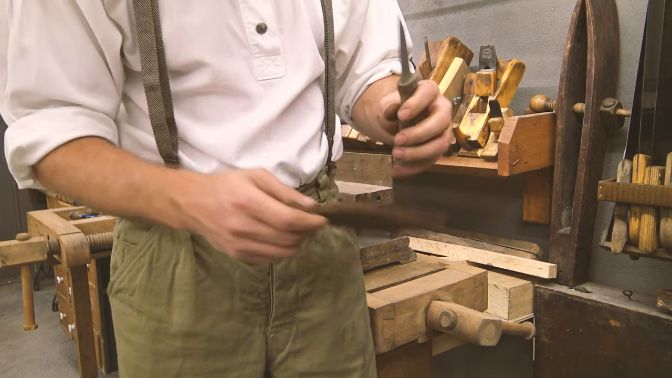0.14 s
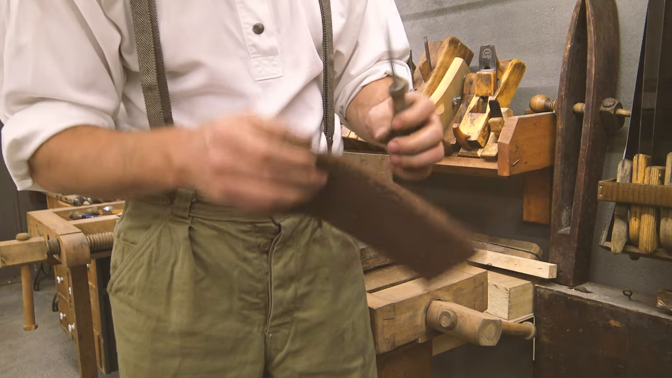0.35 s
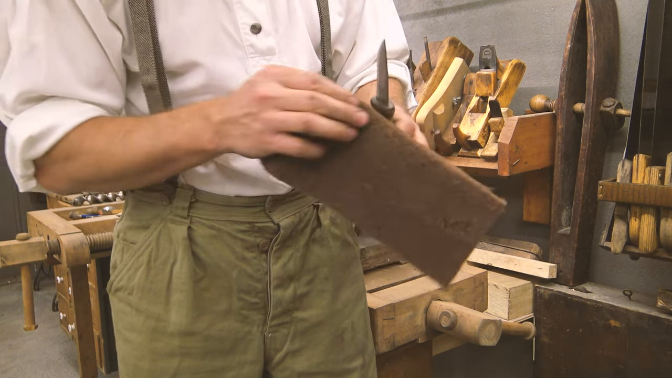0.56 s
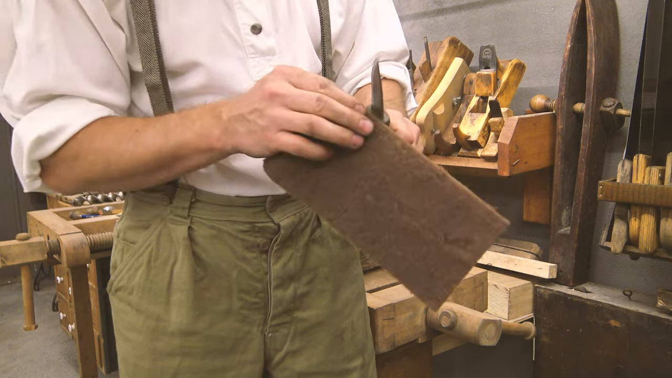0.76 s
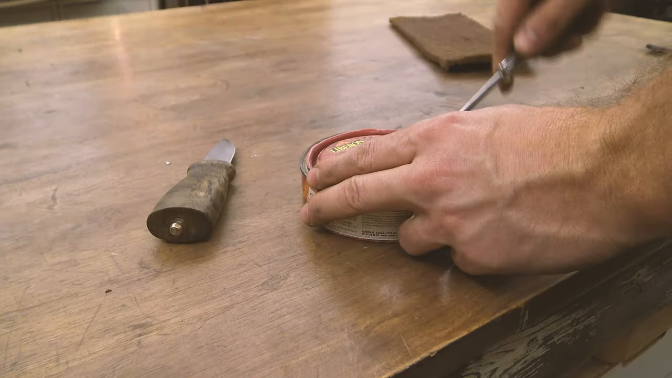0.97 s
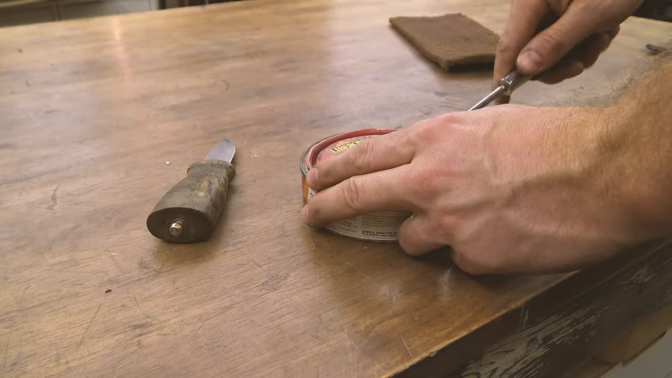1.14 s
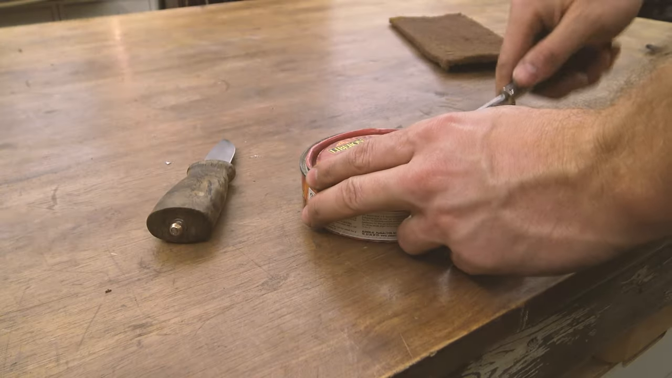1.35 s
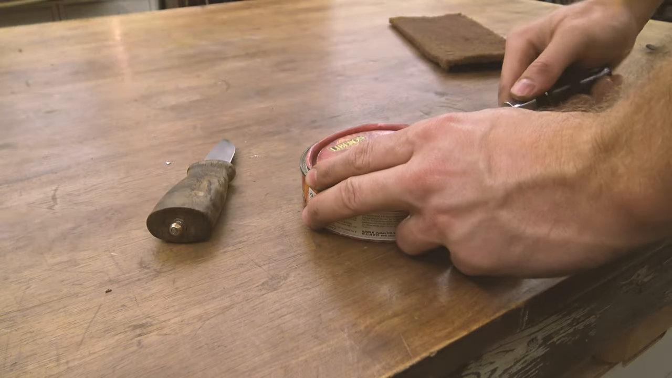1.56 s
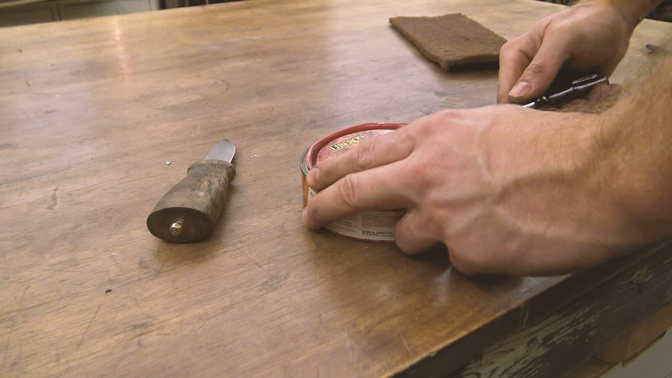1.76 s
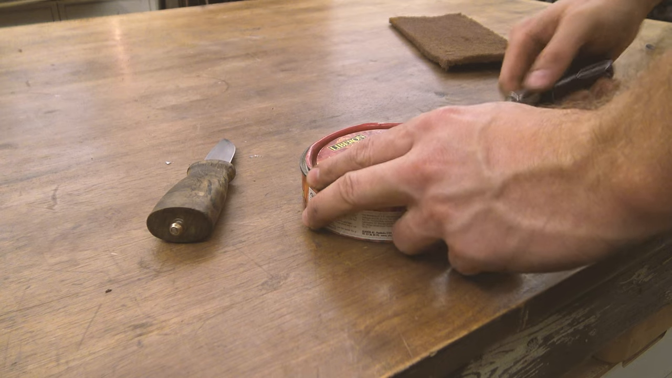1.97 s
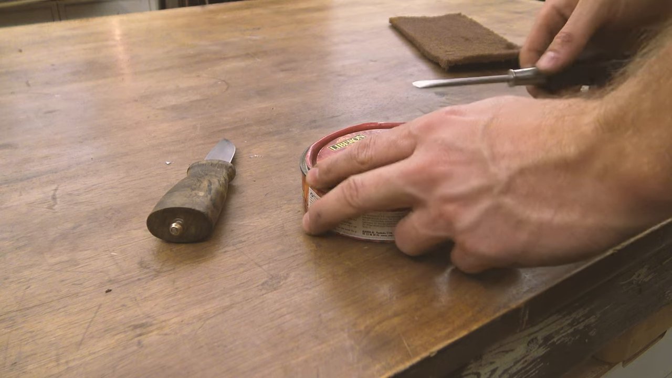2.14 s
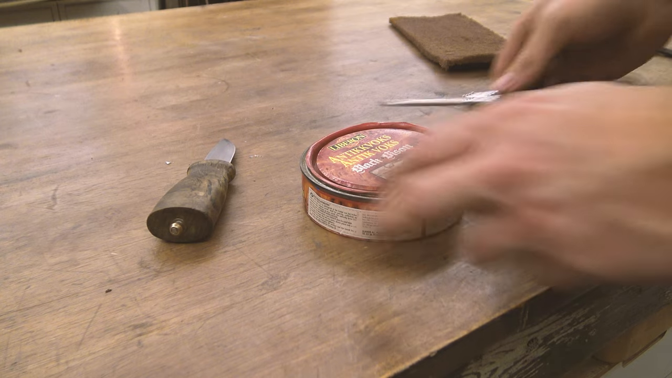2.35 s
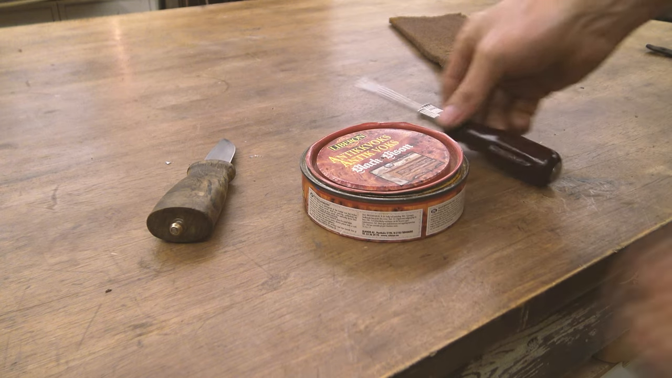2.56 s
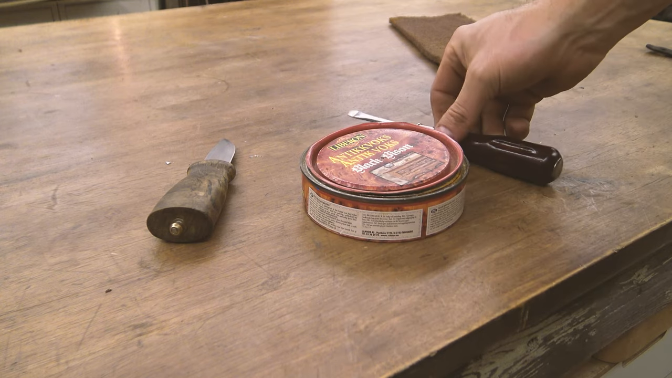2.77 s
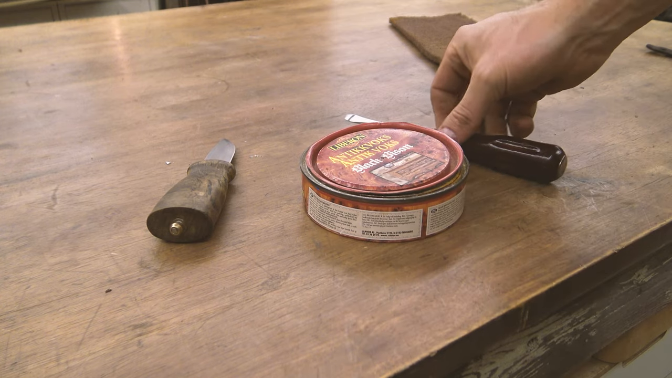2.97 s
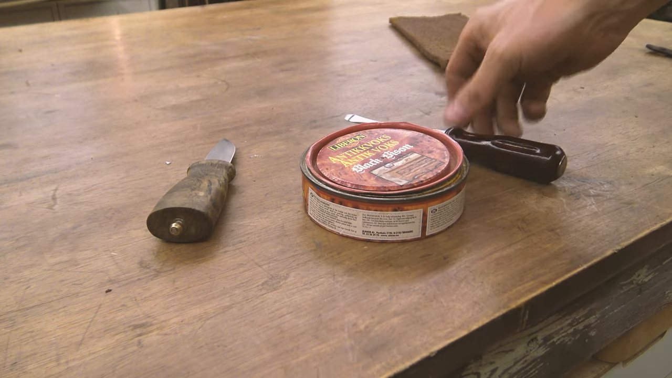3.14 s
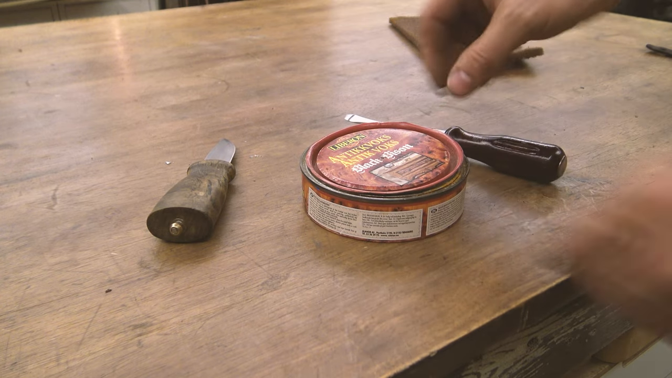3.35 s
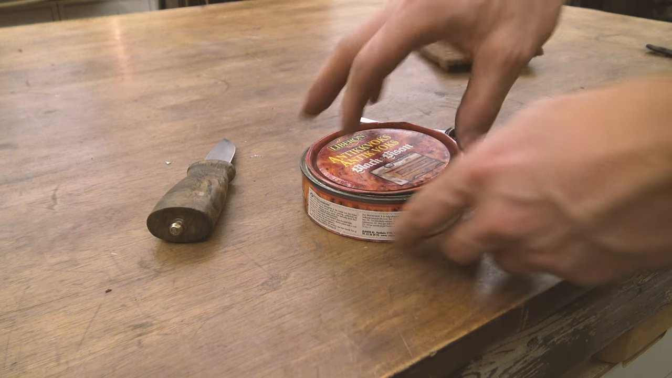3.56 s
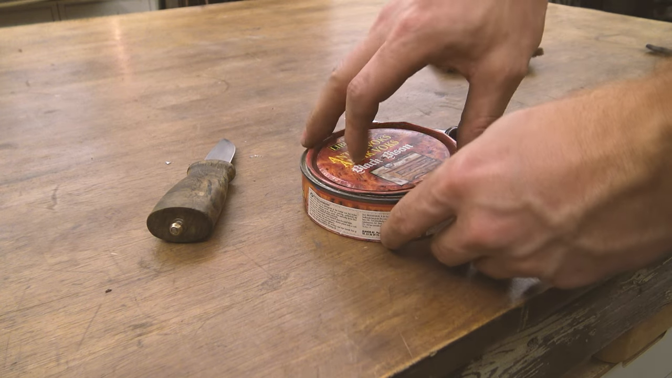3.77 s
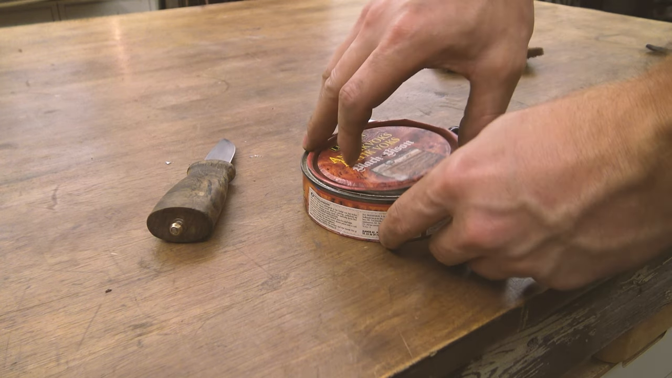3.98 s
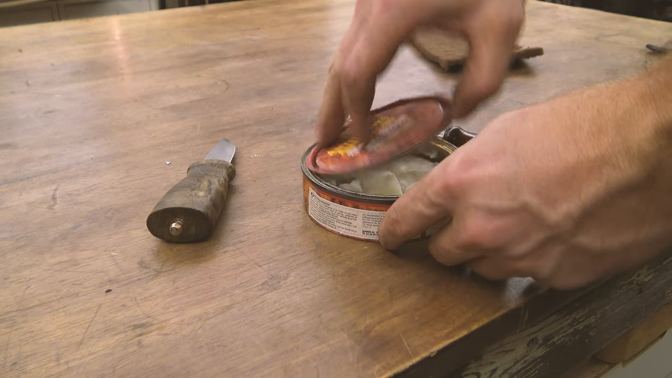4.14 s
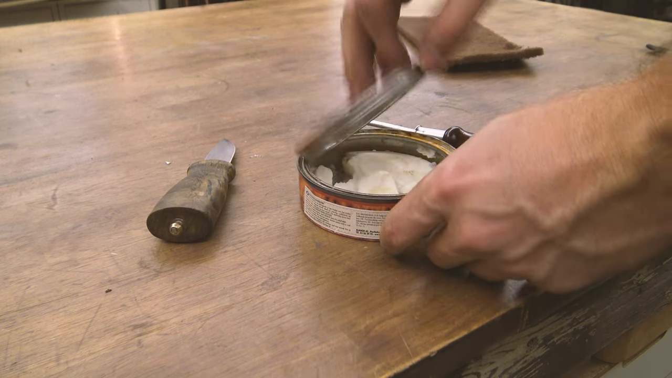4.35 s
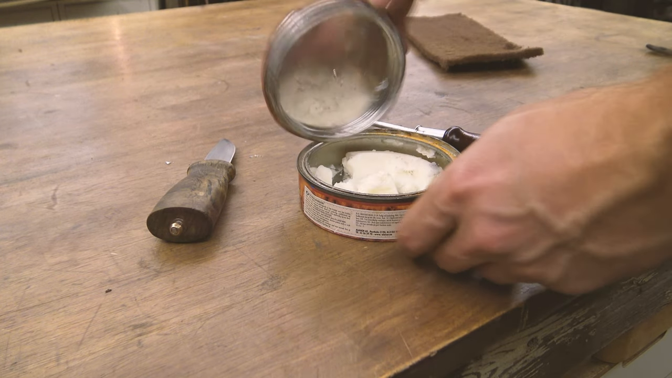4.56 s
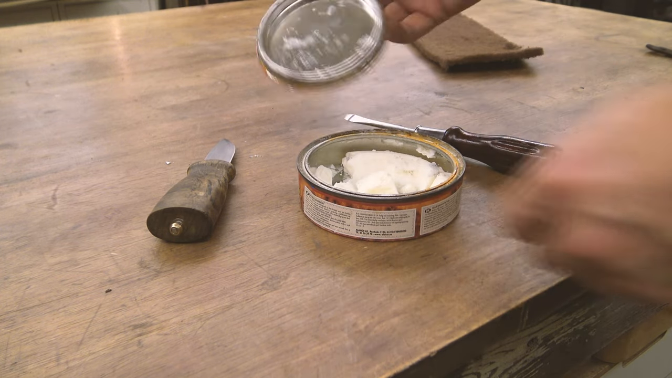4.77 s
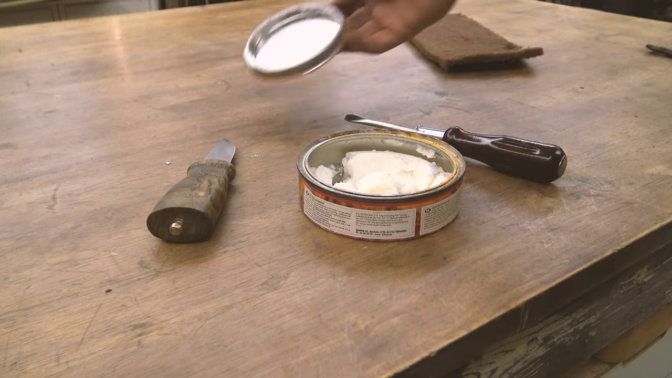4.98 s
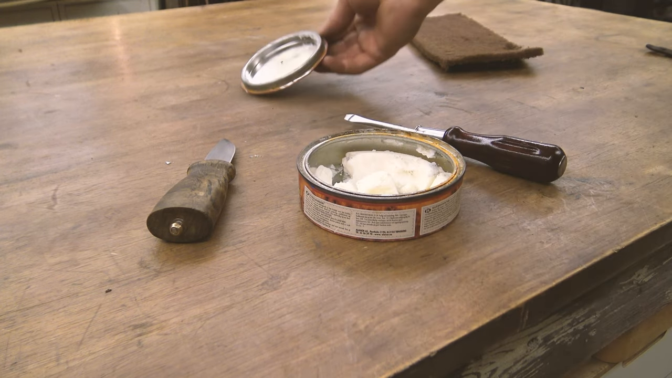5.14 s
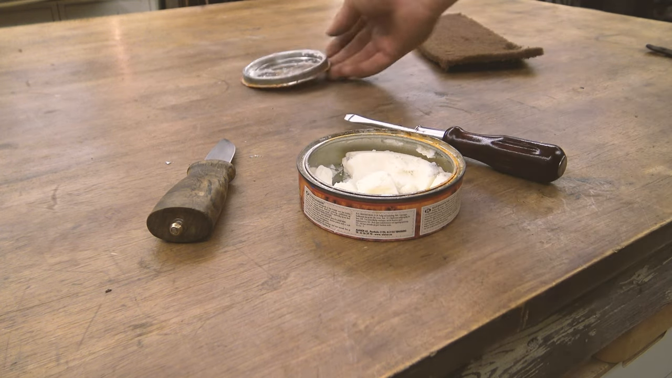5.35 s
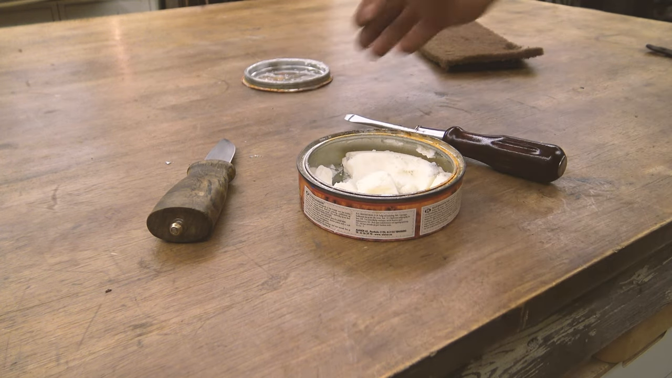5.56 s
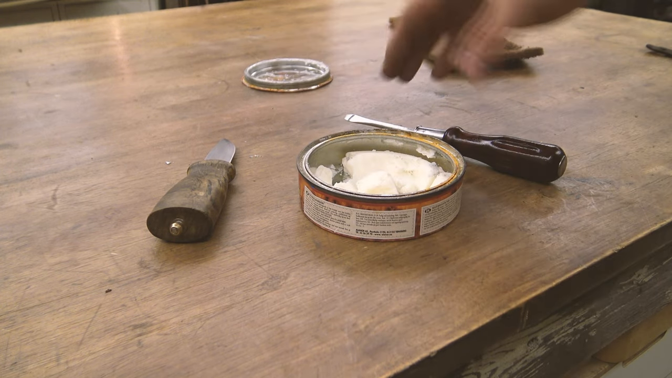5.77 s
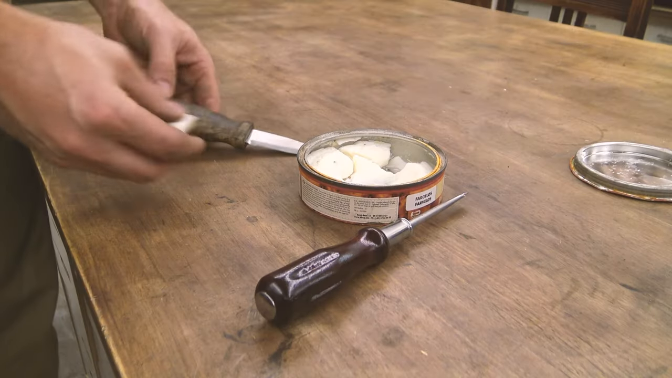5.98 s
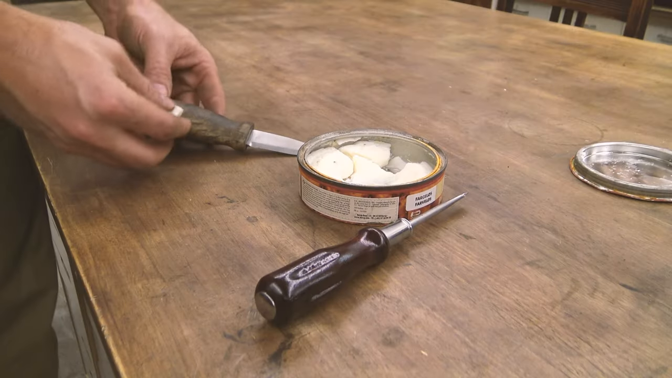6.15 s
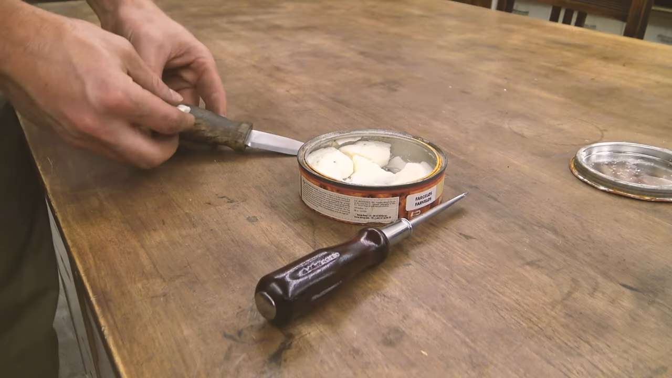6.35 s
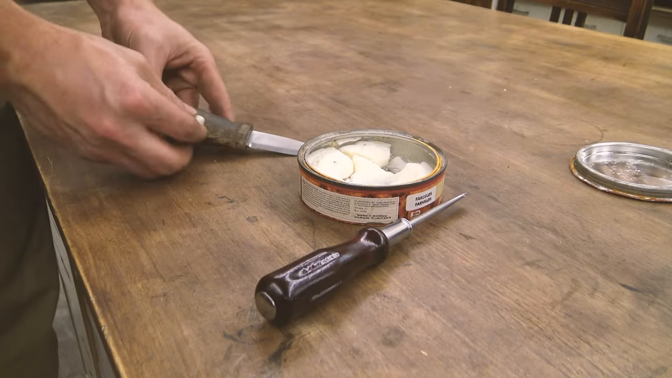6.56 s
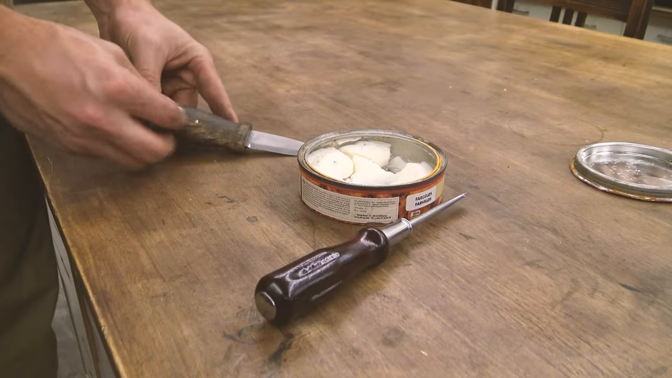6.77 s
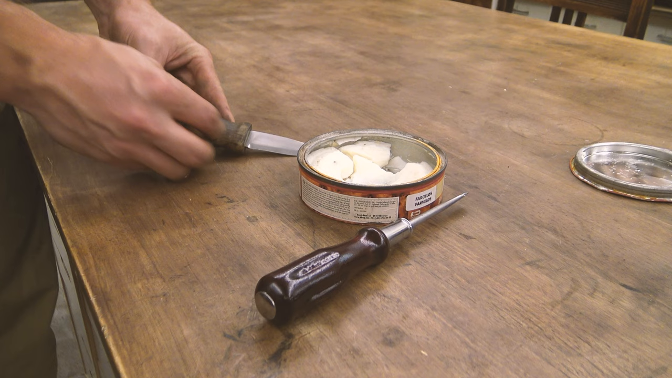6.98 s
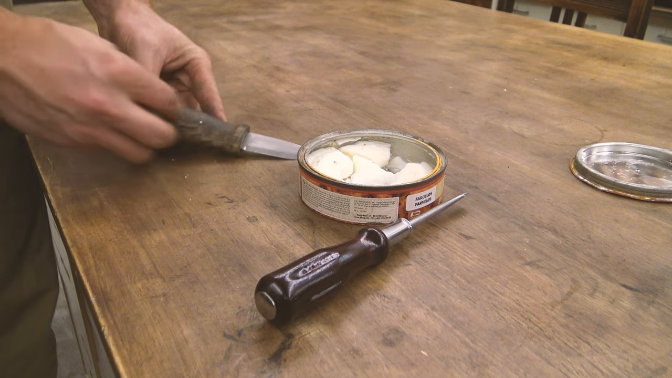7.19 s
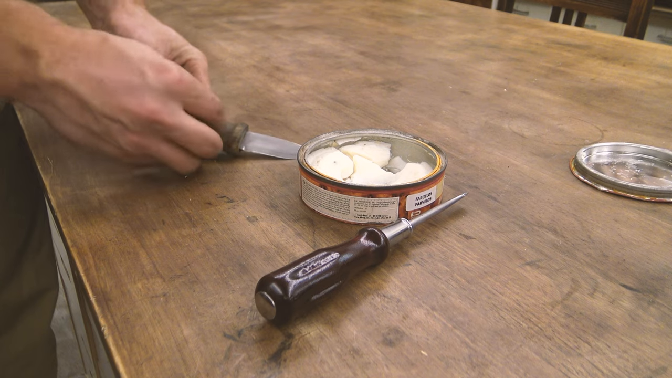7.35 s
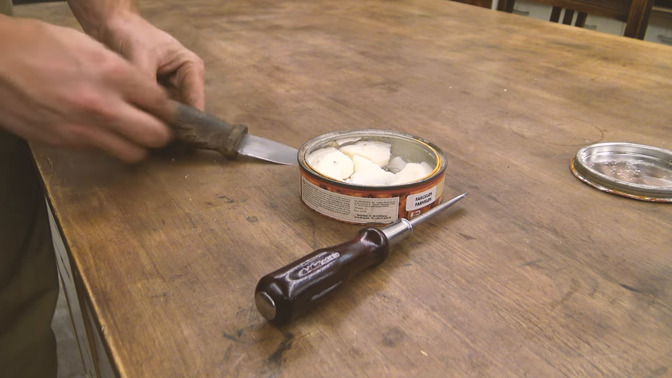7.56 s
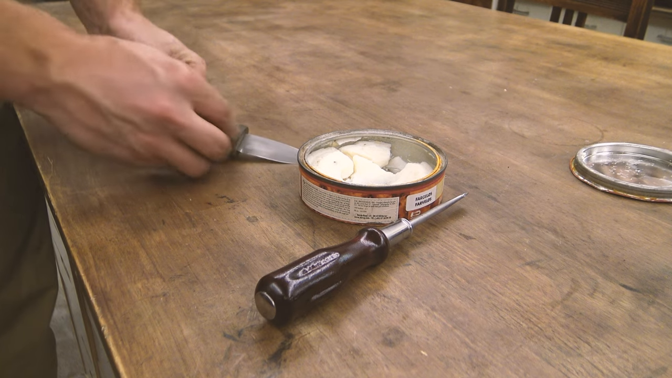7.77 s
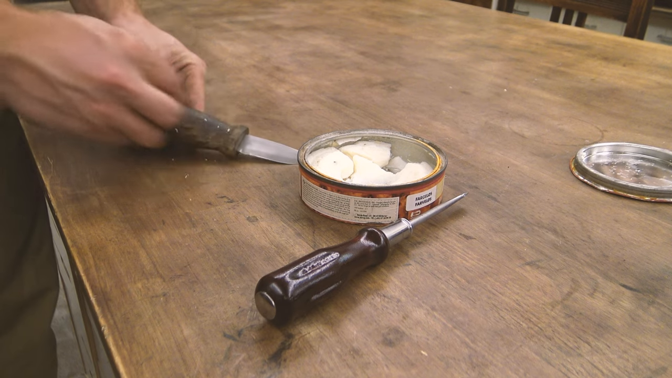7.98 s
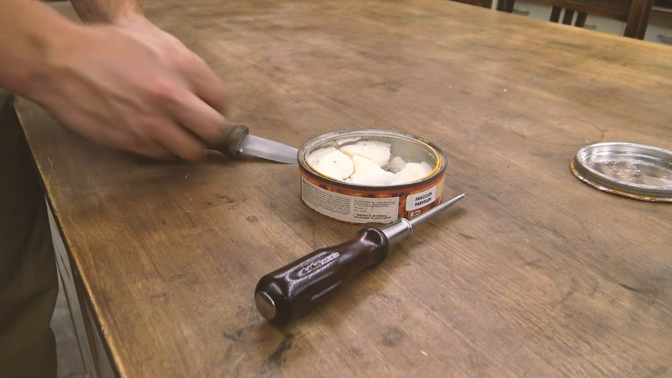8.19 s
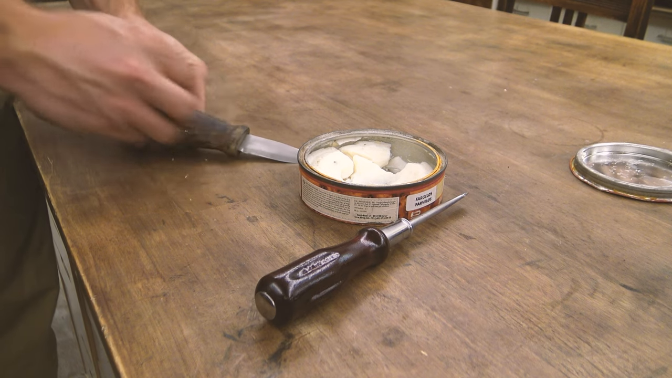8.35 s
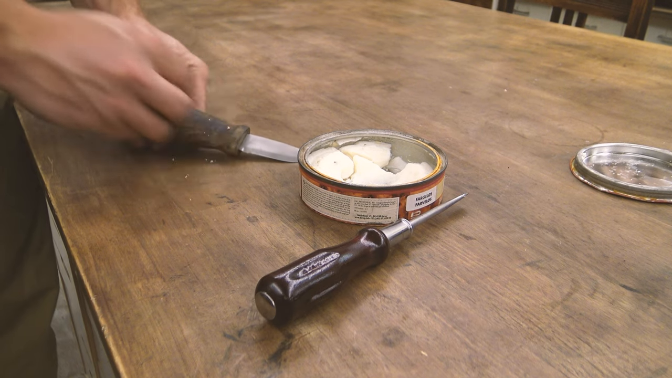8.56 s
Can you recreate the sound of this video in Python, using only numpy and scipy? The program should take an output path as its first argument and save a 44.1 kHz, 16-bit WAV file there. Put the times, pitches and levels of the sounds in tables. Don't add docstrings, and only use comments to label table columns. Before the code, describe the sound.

In a quiet workshop, a tin lid is pried with dull knocks, a screwdriver drops, the lid clanks and rattles, then a knife handle knocks wood.

```python
import sys
import numpy as np
from scipy import signal
from scipy.fft import rfft, irfft
from scipy.io import wavfile
from scipy.ndimage import uniform_filter1d, minimum_filter1d

SR = 44100
rng = np.random.default_rng(int(sys.argv[2]) if len(sys.argv) > 2 else 0)


def boost_factor(decibels):
    exponent = np.asarray(decibels, float) / 20
    return 10 ** exponent


def transcribe(u):
    v = np.clip(np.atleast_2d(u).T, -1, 1)
    q = np.round(v * 32767).astype(np.int16)
    wavfile.write(sys.argv[1], SR, q)


N = 380141

# frequency in Hz, level in dB per Hz.
HISS = [(12, -23), (20, -32), (53, -1), (262, 2.5), (293, 2.5), (422, 2), (527, -1), (590, 1), (678, 0.5),
        (1150, -2), (1610, -4), (2460, -6.5), (2670, -7.5), (6910, -9), (16000, -21)]
# start in seconds, hiss in dB, extra top-end hiss in dB.
SHOTS = [
    (0, -59.5, -70),
    (1.0, -58.5, -72),
    (5.9, -57.5, -88),
]
CROSSFADE_S = 0.068
# middle in seconds, half length in seconds, swell in dB.
RUSTLES = [
    (0, 0.14, 3),
    (3.595, 0.19, 2.5),
]

# frequency in Hz, t60 in seconds.
ROOM = [(100, 0.58), (300, 0.46), (1000, 0.39), (3000, 0.33), (8000, 0.28), (15000, 0.14)]
# frequency in Hz, level in dB, t60 in seconds.
ROOM_MODES = [(113.8, -41, 0.57), (121, -66, 0.7)]
# delay in seconds, level in dB.
NEAR_ECHOES = [(.0074, -13.5), (.0095, -8.5), (.0155, -23), (.021, -12.5)]
# delay in seconds, level in dB.
FAR_ECHOES = [(.004, 3.5), (.0115, -7.5), (.0145, -6.5), (.031, -12), (.045, -21)]
# frequency in Hz, level in dB.
NEAR_COLOUR = [(100, 9.5), (500, 4.5), (1500, 5), (4000, 4), (8000, 0.5), (15000, -27)]
# frequency in Hz, level in dB.
FAR_COLOUR = [(100, -4.5), (400, -3), (1000, -1), (1800, 0.5), (3000, 2.5), (5000, -2.5), (8000, -5),
              (15000, -10.5)]
FAR_LAG_S, FAR_DB = .0553, 1.5
ECHO_CUT_HZ = 14000
CEILING = .35

# start in seconds, peak in dB, brightness in dB per octave, ring in dB.
SEAM = [
    (1.002, -48, -4, -6),
    (1.011, -44.5, -0.5, -1),
    (1.024, -50, -3, -7),
]
# start in seconds, peak in dB, brightness in dB per octave, ring in dB.
PRY = [
    (1.327, -33.5, -7.5, 0),
    (1.349, -54, -5, 3),
    (1.594, -40.5, -7.5, 1),
    (1.602, -34.5, 2.5, -9),
    (1.61, -37, 1.5, -1),
    (1.869, -49.5, -10, -10),
]
# start in seconds, peak in dB, brightness in dB per octave, ring in dB.
TIP_OUT = [
    (2.204, -36, 4.5, -1),
    (2.209, -46, -6.5, 2),
]
# frequency in Hz, level in dB.
PRY_BODY = [(71, -47), (120, -18.5), (395, -4.5), (441, -9), (656, 5), (758, -12), (875, -6.5),
            (1300, -11.5), (1710, -18.5), (9000, -47), (11700, -65), (19800, -120)]
# frequency in Hz, level in dB, t60 in seconds.
TIN = [(318, -36, 0.069), (577, -23, 0.033), (646, 7, 0.11), (1040, -1, 0.12)]

# start in seconds, peak in dB, brightness in dB per octave, ring in dB.
DROP = [
    (2.5645, -8.5, 2.5, 2),
    (2.5725, -23.5, 1, -15),
    (2.577, -28, -3.5, -2),
    (2.596, -13.5, -3, -2.5),
    (2.634, -23.5, -7, -7),
]
# start in seconds, peak in dB, brightness in dB per octave, ring in dB.
SETTLE = [
    (2.856, -29, -2.5, -7),
    (2.871, -22.5, 2.5, -0.5),
    (2.889, -25, -4, -6),
    (2.909, -38, 0.5, 2),
    (5.928, -54.5, -5, 10),
]
# frequency in Hz, level in dB.
DROP_BODY = [(47, -59), (80, -38), (200, -21.5), (306, -14.5), (410, -8), (708, -16.5), (892, -11),
             (970, 4), (1200, -13), (1440, -10), (1750, -15.5), (2100, -27.5), (2900, -36), (3800, -35),
             (5300, -43.5), (6500, -50.5), (12000, -64), (15600, -95), (22000, -120)]
# frequency in Hz, level in dB.
SETTLE_BODY = [(59, -56), (100, -12.5), (269, -2.5), (318, 6.5), (447, -2.5), (690, 2), (850, -15.5),
               (4000, -57.5), (5200, -90), (8800, -120)]
# frequency in Hz, level in dB, t60 in seconds.
HANDLE = [(316, 4.5, 0.057), (510, -17, 0.028), (683, -2, 0.039), (726, 4, 0.13), (798, 8, 0.067),
          (887, -2, 0.12), (1090, -0.5, 0.029), (1410, -24, 0.067)]
HANDLE_FAR_DB = [0.76, 0, 1.5, 0.33, 0.085, 1.5, 0, 0.11]

# start in seconds, peak in dB,
# brightness in dB per octave, ring in dB.
NEAR_TICK = [
    (3.789, -43, 2, -20),
    (4.063, -39, 1.5, -20),
    (4.119, -37, 5, -24),
    (1.5, -40, 0, -9),
]
# start in seconds, peak in dB, brightness in dB per octave, ring in dB.
GRIP = [
    (3.734, -45.5, -4.5, -8),
    (3.924, -43.5, -5.5, -1),
    (3.952, -53, -0.5, 4),
    (4.005, -35.5, -2.5, -14),
    (4.0635, -38.5, 3, -12),
]
# frequency in Hz, level in dB.
GRIP_BODY = [(180, -36), (300, -9.5), (505, -6.5), (669, 0), (1040, -8.5), (1140, -19), (4000, -40),
             (5200, -71), (8800, -120)]
# start in seconds, peak in dB, brightness in dB per octave, ring in dB.
LIFT = [
    (4.238, -32.5, 3.5, -17),
    (4.304, -35, 3, -14),
    (4.462, -32, -2, -12),
    (4.499, -37.5, -5.5, -1),
    (4.534, -32.5, -5, -8),
    (4.588, -47, 0, 6.5),
]
# frequency in Hz, level in dB.
LIFT_BODY = [(71, -35.5), (120, -17), (318, -4.5), (355, 6), (457, -6.5), (1070, -1.5), (2780, -22),
             (6270, -27), (9000, -35), (11700, -66), (19800, -120)]
HELD_LID_HZ = [354, 765, 1028, 1592, 2218, 3860, 4900, 6180]
# level in dB, t60 in seconds.
HELD_LID_RING = [(5.5, 0.081), (-1.5, 1), (-1, 0.032), (1.5, 0.17), (0, 0.068), (-8, 0.067), (-13, 0.042),
                 (-13, 0.094)]
# start in seconds, peak in dB, brightness in dB per octave, ring in dB.
RIM_TICK = [
    (4.3585, -47, 7, 3),
    (4.4618, -35, 5.5, -5),
    (4.590, -48.5, 9, 7.5),
    (4.5954, -34.5, 1, -10),
    (4.6004, -31, 0, 6),
    (4.6045, -38, 1, 1),
    (4.609, -47, -12, -5),
]
# frequency in Hz, level in dB.
RIM_BODY = [(1180, -36), (2000, -16), (2200, -15), (3030, -29), (3980, -8.5), (4900, -10), (5800, -12),
            (6320, -9.5), (8320, -18.5), (13000, -37)]
RIM_HZ = [1340, 2240, 3240, 3950, 5080, 6200, 7300]
# level in dB, t60 in seconds.
RIM_RING = [(-6, .06), (-13, 0.055), (-28, .1), (-5.5, 0.072), (-21, .05), (-6.5, 0.06), (-22, 0.037)]
# start in seconds, peak in dB, brightness in dB per octave, ring in dB.
PING = [
    (4.566, -55, 5.5, -1),
    (4.654, -35, 0, 3.5),
    (4.658, -47, -2, 0),
]
# frequency in Hz, level in dB.
PING_BODY = [(3000, -60), (8000, -20), (10200, 0), (11500, -10), (15000, -47)]
# frequency in Hz, level in dB, t60 in seconds.
PING_MODES = [(9050, -9, .03), (10300, 0, .025)]

# time in seconds, level in dB, cavity in Hz, bright share in dB.
SLIDE = [
    (3.65, -60, 756, -10),
    (3.916, -47.5, 600, -23),
    (4.09, -66, 740, -8),
    (4.18, -37.5, 895, -5),
    (4.274, -34.5, 1140, -5.5),
    (4.424, -38.5, 1140, -5.5),
    (4.49, -49, 880, -33),
    (4.63, -43.5, 705, -27),
    (4.85, -57.5, 720, 13),
]
# frequency in Hz, level in dB, t60 in seconds.
RUBBED_LID = [(350, -0.5, 0.12), (850, 0, 0.058), (1640, -3, 0.014), (2100, -4, 0.017), (2370, -7, 0.051),
              (3240, -20, 0.066), (3960, -13, .03), (5100, -16, .03), (6160, -10, 0.045), (7100, -11, .04)]
SING_START_S = [3.92, 3.955, 4.12, 4.19, 4.24, 4.34, 4.32, 4.14, 4.33, 4.12, 4.21, 4.26, 4.31, 4.37, 4.6]
SING_LENGTH_S = [.05, .16, .07, .1, .085, .12, .15, .1, .14, .15, .04, .05, .045, .08, .09]
SING_FROM_HZ = [570, 730, 770, 840, 1140, 1090, 1335, 2150, 3205, 6170, 5080, 5120, 3950, 1600, 1590]
SING_TO_HZ = [560, 660, 830, 830, 1125, 1075, 1345, 2080, 3215, 6170, 5080, 5080, 3930, 1560, 1595]
SING_DB = [-61, -50, -62, -54, -50.5, -55.5, -56, -62.5, -62.5, -65.5, -65, -64, -60, -61, -61]
SING_WIDTH_HZ, SING_STEADY = 35, 1.1

# start in seconds, peak in dB, brightness in dB per octave, ring in dB.
TOUCH = [
    (5.173, -16, 1.5, 3.5),
    (5.176, -19, 4, -18),
]
# frequency in Hz, level in dB.
TOUCH_BODY = [(60, -45), (150, -9), (200, -22), (300, -11), (500, -21), (750, 2), (1100, -1.5),
              (1600, -3.5), (2200, -9.5), (3200, -18), (4500, -30), (6300, -30.5), (9000, -40.5),
              (15000, -48), (21000, -70)]
# frequency in Hz, level in dB, t60 in seconds.
TOUCH_MODES = [(742, -10, 0.15), (1070, -7, 0.04), (1233, 4, 0.035), (1500, -15, 0.04), (1584, -3.5, 0.072),
               (2190, -15.5, 0.058), (3870, -13, .06), (4870, -15, 0.038), (6180, -18, .09)]
TOUCH_FAR_DB = [9, 5, 2.5, -1, 14.5, 7, 1, 1, 5]
# start in seconds, peak in dB, brightness in dB per octave, ring in dB.
SLIP = [
    (5.378, -55.5, 8.5, 10),
    (5.395, -57, 7.5, 13),
    (5.426, -56, 8.5, 10),
    (5.445, -36, -7, 7),
]
SLIP_FAR_DB = [7, 0, 1, 2, 3, -5, -9, 6, 0, -6, -6, -3, 0, 5]
# start in seconds, peak in dB, brightness in dB per octave, ring in dB.
CLANK = [
    (5.4835, -11.5, 1, -11.5),
    (5.4865, -5.5, 6.5, 3.5),
    (5.625, -28, 0, -15),
    (5.4965, -14, 2.5, -11),
    (5.5115, -12.5, 1.5, -9),
    (5.545, -20, 1.5, -13),
]
# frequency in Hz, level in dB.
CLANK_BODY = [(40, -53), (100, -20), (250, -19), (400, -10), (650, -9.5), (1000, -1), (1500, -7.5),
              (2100, -9), (3000, -11.5), (3900, -9), (5300, -28.5), (5900, -16.5), (7200, -26.5),
              (9000, -30), (15500, -41), (21000, -48)]
LID_HZ = [1025, 1592, 1879, 2071, 2140, 2907, 3850, 4780, 5030, 6205, 6690, 8123, 9040, 11100]
# level in dB, t60 in seconds.
LID_RING = [(-1.5, 0.13), (-16, 0.11), (1, 0.11), (-4.5, 0.11), (-2.5, 0.18), (-7.5, 0.21), (-13, 0.11),
            (-12.5, 0.057), (-12.5, 0.05), (-6.5, 0.093), (-14, 0.064), (-26, 0.095), (-39, .07),
            (-24, 0.043)]
LID_FAR_DB = [2.5, 6, 5, 0, 2, -2, 2, 4, 3, -4.5, -4, 0, 5, -1]
# start in seconds, peak in dB, brightness in dB per octave, ring in dB.
CRACK = [
    (5.4865, -36, -8, -9),
    (5.508, -39, 0, -20),
    (5.5405, -24, 0, -20),
]
# frequency in Hz, level in dB.
CRACK_BODY = [(3000, -35), (6000, -14), (9000, -8), (12000, -14), (15500, -12), (21000, 9)]
# frequency in Hz, start in seconds, level in dB.
WOBBLE = [
    (1877, 5.54, -14.5),
    (2140, 5.565, -26),
]
WOBBLE_RISE_S, WOBBLE_END_S, WOBBLE_DROP_DB, WOBBLE_DROP_S, WOBBLE_FADE_DB_PER_S = 0.011, 5.62, -17, 0.012, 111
RATTLE_START_S, RATTLE_GAP_S, RATTLE_UNEVEN = 5.503, .0087, 0.201
RATTLE_DB, RATTLE_LOSS_DB, RATTLE_OFFBEAT_DB = -7, 2.1, -15
RATTLE_TILT_DB, RATTLE_RING_DB, RATTLE_RING_LOSS_DB = -0.5, -6, -2.83
THUMP_S, THUMP_HZ, THUMP_DB, THUMP_T60_S = 5.487, 58.3, -49, .35
REST_S, REST_DB, REST_FADE_S = 5.572, -6, .012
CUT_S, CUT_FADE_S = 5.875, .025

# most pressure in seconds, rise in seconds, fall in seconds, level in dB, resonance in Hz.
RUB = [
    (1.07, 0.053, 0.21, -62, 656),
    (1.38, 0.087, 0.19, -54, 620),
    (1.58, 0.092, 0.17, -42.5, 636),
    (2.264, 0.078, 0.91, -53, 744),
    (6.738, 0.15, 0.15, -57, 1090),
    (7.172, 0.067, 0.21, -45, 990),
    (7.72, 0.023, 0.097, -50, 910),
]
STROKE_RISE_DB, STROKE_FALL_DB, STROKE_BRIGHT_DB = 57, 22, -8.5
STROKE_PITCH_START, STROKE_PITCH_END = 0.88, 1.07
# frequency in Hz, level in dB, t60 in seconds.
OPEN_TIN = [(371, 4, 0.12), (940, -13, .04), (1249, 2.5, 0.15), (2180, -17, 0.069)]
OPEN_TIN_FAR_DB = [-1, -7, 2.5, 0]
# start in seconds, peak in dB, brightness in dB per octave, ring in dB.
BLADE_TICK = [
    (7.4915, -47.5, 0, 2),
    (7.4965, -45.5, 0, 3),
    (7.507, -51, -3, 5),
]
# frequency in Hz, level in dB.
TICK_BODY = [(760, -51), (1300, -15), (1680, 3), (2350, -13), (2690, 0), (3110, -11), (3600, 0), (4200, 4),
             (5400, -20), (7000, -28), (15400, -120)]
# frequency in Hz, level in dB, t60 in seconds.
BLADE = [(1690, -20, .05), (2720, 4, 0.18), (3920, -4, .09), (4270, -5, 0.045), (2650, -6, .08),
         (3550, -5, .04)]
# start in seconds, peak in dB, brightness in dB per octave, ring in dB.
NUDGE = [
    (7.581, -34.5, -1, -0.5),
    (7.596, -36.5, -3.5, -8),
    (7.75, -57, -7, 7.5),
    (7.79, -56.5, 1.5, 12.5),
    (7.848, -62, -12, 1.5),
    (7.898, -59, -4, 3),
]
# frequency in Hz, level in dB.
NUDGE_BODY = [(88, -60), (150, -26), (278, -5), (524, -7), (621, -7.5), (782, 1.5), (1210, -4),
              (1380, -14.5), (2200, -15), (2700, -26.5), (6000, -34), (7800, -64), (13200, -120)]
# start in seconds, peak in dB, brightness in dB
# per octave, ring in dB.
LATE_RETURN = [
    (7.653, -38.5, -6, 0),
    (8.089, -17.5, 0, -1),
]
# start in seconds, peak in dB, brightness in dB per octave, ring in dB.
KNOCK = [
    (8.019, -13.5, 1, 1.5),
    (8.029, -28, -2, -8),
    (8.034, -17.5, -4, -8),
    (8.049, -30, -6, -11),
]
# frequency in Hz, level in dB.
KNOCK_BODY = [(47, -83), (80, -13.5), (147, -27.5), (354, -14.5), (506, -11), (723, -29), (820, -12),
              (1250, -3.5), (1600, -2), (1900, -17), (2200, -16), (2700, -18), (3200, -18.5), (4500, -16),
              (5500, -29.5), (6500, -27.5), (8500, -39), (15600, -53)]
# frequency in Hz, level in dB, t60 in seconds.
KNIFE = [(360, -7.5, 0.14), (518, -12, 0.032), (838, -6, 0.05), (955, -1, 0.1), (1232, 3, 0.12),
         (1378, -1, 0.08), (1510, 0, 0.07), (1620, -7, 0.046), (2503, -2.5, .045), (3100, -10, .03),
         (4200, -6, 0.019), (6870, -8.5, 0.032)]
KNIFE_FAR_DB = [5.5, 9, 2.5, -7, -0.5, 3, -10, -1, -10, -9, 2, -8]


def at_hz(points, hz):
    table_hz, value = np.array(points)[:, 0], np.array(points)[:, 1]
    return np.interp(np.log(hz), np.log(table_hz), value)


def rms_one(x):
    return x / np.sqrt(np.mean(x ** 2) + 1e-20)


def coloured(x, spectrum):
    hz = np.maximum(np.arange(len(x) // 2 + 1) * SR / len(x), 1)
    return irfft(rfft(x) * boost_factor(at_hz(spectrum, hz)), len(x))


def bandpass(x, low_hz, high_hz, order=2):
    return signal.sosfilt(signal.butter(order, [low_hz, high_hz], "band", fs=SR, output="sos"), x)


def add(out, sound, s):
    i = int(round(s * SR))
    out[..., i:i + sound.shape[-1]] += sound[..., :N - i]


def hiss():
    t = np.arange(N) / SR
    start_s, level_db, top_db = np.transpose(SHOTS)
    shot = np.maximum(np.searchsorted(start_s, t, side="right") - 1, 0)
    fade = int(CROSSFADE_S * SR)
    level_db = uniform_filter1d(level_db[shot], size=fade)
    top_db = uniform_filter1d(top_db[shot], size=fade)
    for s, half_s, swell_db in RUSTLES:
        level_db = level_db + swell_db * np.maximum(1 - np.abs(t - s) / half_s, 0)
    top = bandpass(rng.standard_normal(N), 2500, 12000, order=1)
    air = rms_one(coloured(rng.standard_normal(N + 1), HISS)[:N])
    return air * boost_factor(level_db) + rms_one(top) * boost_factor(top_db)


def response(echoes, tail_db, build_s):
    t = np.arange(SR) / SR
    white, edges = rng.standard_normal((2, SR)), 60 * 2 ** np.arange(0, 8.5, .5)
    tail = np.zeros(SR)
    for k, (low, high) in enumerate(zip(edges, edges[1:])):
        tail += bandpass(white[k % 2], low, high) * boost_factor(-60 * t / at_hz(ROOM, low))
    out = boost_factor(tail_db) * tail * (1 - np.exp(-t / build_s))
    out[0] += 1
    walls = np.zeros(SR)
    for s, level_db in echoes:
        walls[int(s * SR)] += boost_factor(level_db)
    return out + signal.lfilter(*signal.butter(1, ECHO_CUT_HZ, fs=SR), walls)


def rooms():
    far = np.pad(response(FAR_ECHOES, tail_db=-22.5, build_s=0.00017), (int(FAR_LAG_S * SR), 0))
    far = boost_factor(FAR_DB) * coloured(far, FAR_COLOUR)
    near = np.pad(response(NEAR_ECHOES, tail_db=-34, build_s=.003), (64, 0))
    near = coloured(near, NEAR_COLOUR)[64:]
    no_bass = signal.butter(4, 175, "high", fs=SR, output="sos")
    far, near = signal.sosfilt(no_bass, far), signal.sosfilt(no_bass, near)
    t = np.arange(len(far)) / SR
    for hz, level_db, t60 in ROOM_MODES:
        far += boost_factor(level_db - 60 * t / t60) * np.sin(2 * np.pi * hz * t) * (1 - np.exp(-t / 0.14))
    return near, far


def heard(dry, near, far):
    return signal.fftconvolve(dry[0], near)[:N] + signal.fftconvolve(dry[1], far)[:N]


def click(spectrum_db):
    cepstrum = irfft(np.maximum(spectrum_db, -100) * np.log(10) / 20)
    half = len(cepstrum) // 2
    cepstrum[1:half] *= 2
    cepstrum[half + 1:] = 0
    return irfft(np.exp(rfft(cepstrum)))[:half]


def blows(events, body, modes, cycles, ring_db, far_db, beam_db=0, rest_db=0):
    out, t = np.zeros((2, N)), np.arange(SR // 2)[:, None] / SR
    chance = rng.standard_normal((len(events), 500))
    hz, mode_db, t60 = np.transpose(modes)
    bins_hz = np.maximum(np.arange(2049) * SR / 4096, 20)
    for (s, peak_db, tilt_db, more_ring_db), draw in zip(events, chance):
        ripple_db = 1.2 * np.interp(np.log2(bins_hz / 50) * 3, np.arange(30), draw[:30])
        thud = click(at_hz(body, bins_hz) + tilt_db * np.log2(bins_hz / 1000) + ripple_db)
        scatter = boost_factor(-18 - 60 * t[:440, 0] * 1000 / cycles) * np.array([draw[60:], draw[:59:-1]])
        scatter[:, 0] = 1
        thud = signal.fftconvolve(thud[None], scatter)
        strength = boost_factor(mode_db + tilt_db * np.log2(hz / 1000) + 1.5 * draw[30:30 + len(hz)])
        towards = strength * boost_factor([0 * hz, beam_db + 0 * hz])
        beat = 1 + np.minimum(hz / 9000, .9) * np.cos(2 * np.pi * 0.0074 * hz * t + draw[59])
        ring = (boost_factor(-60 * t / t60) * beat * np.sin(2 * np.pi * hz * t)) @ towards.T
        resting = np.clip((t[:, 0] + s - REST_S) / REST_FADE_S, 0, 1)
        sound = ring.T * boost_factor(ring_db + more_ring_db + rest_db * resting)
        sound = signal.lfilter(*signal.butter(2, 12000, fs=SR), sound)
        sound[:, :thud.shape[1]] += thud / np.abs(thud).max(axis=1, keepdims=True)
        add(out, boost_factor(peak_db + np.array([[0], [far_db]])) * sound, s + .001)
    return out


def prying():
    out = blows(SEAM, PRY_BODY, TIN, cycles=8.2, ring_db=-28, far_db=-10.5)
    out += blows(PRY, PRY_BODY, TIN, cycles=15.0, ring_db=-30, far_db=-2.0)
    return out + blows(TIP_OUT, NUDGE_BODY, TIN, cycles=5.7, ring_db=-21.0, far_db=-4)


def stroke(s, rise_s, fall_s, level_db, hz):
    return [(s - rise_s, level_db - STROKE_RISE_DB, hz * STROKE_PITCH_START, STROKE_BRIGHT_DB),
            (s, level_db, hz, STROKE_BRIGHT_DB),
            (s + fall_s, level_db - STROKE_FALL_DB, hz * STROKE_PITCH_END, STROKE_BRIGHT_DB)]


def friction(path, grains_per_s, width, bright_hz, gain_db, modes, ring_db):
    s, level_db, centre_hz, bright_db = np.transpose(path)
    t = np.arange(s[0] * SR, s[-1] * SR) / SR
    sizes = boost_factor(3.8 * np.minimum(rng.exponential(1, 2 * SR), 4)) * rng.choice([-1, 1], 2 * SR)
    grains = (sizes * (rng.random(2 * SR) < grains_per_s / SR))[:len(t)]
    phase = 2 * np.pi * np.cumsum(np.interp(t, s, centre_hz)) / SR
    pole = np.exp(-np.pi * width * np.mean(centre_hz) / SR)
    slow = signal.lfilter([1], [1, -pole], grains * np.exp(-1j * phase))
    hollow = bandpass(np.real(slow * np.exp(1j * phase)), 220, 2600)
    bright = rms_one(bandpass(grains, *bright_hz))
    for hz, mode_db, t60 in modes:
        r, w = boost_factor(-60 / (0.5 * t60 * SR)), 2 * np.pi * hz / SR
        ring = signal.lfilter([1], [1, -2 * r * np.cos(w), r * r], grains)
        bright += boost_factor(mode_db + ring_db) * rms_one(ring)
    sound = rms_one(hollow) + boost_factor(np.interp(t, s, bright_db)) * bright
    pressure = boost_factor(np.interp(t, s, level_db) + gain_db) * signal.windows.tukey(len(t), .06)
    out = np.zeros(N)
    lead_s = 0.034
    add(out, sound * pressure, s[0] - lead_s)
    return out


def bench_rubbing():
    return sum(friction(stroke(*row), grains_per_s=1900, width=0.18, bright_hz=[2000, 5000], gain_db=-18.0,
                        modes=OPEN_TIN, ring_db=-10.0) for row in RUB)


def near_ticks():
    return blows(NEAR_TICK, GRIP_BODY, TIN, cycles=6.7, ring_db=-22.0, far_db=-30)


def dropped_screwdriver():
    out = blows(DROP, DROP_BODY, HANDLE, cycles=21.0, ring_db=-22.5, far_db=1.0, beam_db=HANDLE_FAR_DB)
    return out + blows(SETTLE, SETTLE_BODY, HANDLE, cycles=17, ring_db=-29.5, far_db=-2.4)


def lid_rubbing():
    return friction(SLIDE, grains_per_s=2500, width=0.52, bright_hz=[1800, 7500], gain_db=-23.0,
                    modes=RUBBED_LID, ring_db=-4.5)


def lid_lifting():
    held_lid, rim = np.column_stack([HELD_LID_HZ, HELD_LID_RING]), np.column_stack([RIM_HZ, RIM_RING])
    out = blows(GRIP, GRIP_BODY, TIN, cycles=6.5, ring_db=-23.0, far_db=-6)
    out += blows(LIFT, LIFT_BODY, held_lid, cycles=14.0, ring_db=-17.5, far_db=-2.1)
    out += blows(RIM_TICK, RIM_BODY, rim, cycles=16, ring_db=-23.0, far_db=-7.5)
    return out + blows(PING, PING_BODY, PING_MODES, cycles=12, ring_db=-16, far_db=-20)


def singing():
    out, pole = np.zeros(N), np.exp(-np.pi * SING_WIDTH_HZ / SR)
    chance = rng.standard_normal((len(SING_DB), 2, SR // 2))
    notes = zip(SING_START_S, SING_LENGTH_S, SING_FROM_HZ, SING_TO_HZ, SING_DB, chance)
    for s, length_s, from_hz, to_hz, level_db, draw in notes:
        share = np.linspace(0, 1, int(length_s * SR))
        tremble = rms_one(signal.lfilter([1], [1, -pole], draw))[:, -len(share):]
        phase = 2 * np.pi * np.cumsum(from_hz + (to_hz - from_hz) * share) / SR
        tone = (SING_STEADY + tremble[0]) * np.sin(phase) + tremble[1] * np.cos(phase)
        add(out, boost_factor(level_db) * np.sin(np.pi * share) * tone, s)
    return out


def lid_touching():
    return blows(TOUCH, TOUCH_BODY, TOUCH_MODES, cycles=14.4, ring_db=-19.0, far_db=-2.5, beam_db=TOUCH_FAR_DB)


def rattle(count):
    k = np.arange(count)
    s = RATTLE_START_S + RATTLE_GAP_S * (k + RATTLE_UNEVEN * rng.uniform(-0.997, 1, count))
    peak_db = RATTLE_DB - RATTLE_LOSS_DB * k + RATTLE_OFFBEAT_DB * (k % 2)
    return list(zip(s, peak_db, RATTLE_TILT_DB + 0 * s, RATTLE_RING_DB - RATTLE_RING_LOSS_DB * k))


def lid_landing():
    lid = np.column_stack([LID_HZ, LID_RING])
    out = blows(SLIP, CLANK_BODY, lid, cycles=31.0, ring_db=-23.5, far_db=-3.0,
                beam_db=SLIP_FAR_DB, rest_db=REST_DB)
    out += blows(CLANK + rattle(count=9), CLANK_BODY, lid, cycles=34.0, ring_db=-25.0, far_db=-3.5,
                 beam_db=LID_FAR_DB, rest_db=REST_DB)
    return out + blows(CRACK, CRACK_BODY, lid, cycles=22.0, ring_db=-30, far_db=-30)


def thump():
    t, out = np.arange(SR // 2) / SR, np.zeros(N)
    shudder = boost_factor(THUMP_DB - 60 * t / THUMP_T60_S) * np.sin(2 * np.pi * THUMP_HZ * t)
    add(out, shudder, THUMP_S)
    add(out, shudder * boost_factor(6.0), THUMP_S + FAR_LAG_S)
    return out


def wobble():
    t, out = np.arange(N) / SR, np.zeros(N)
    after = np.maximum(t - WOBBLE_END_S, 0)
    loss_db = WOBBLE_DROP_DB * np.minimum(after / WOBBLE_DROP_S, 1) - WOBBLE_FADE_DB_PER_S * after
    for hz, s, level_db in WOBBLE:
        rise = np.clip((t - s) / WOBBLE_RISE_S, 0, 1)
        out += boost_factor(level_db + loss_db) * rise * np.sin(2 * np.pi * hz * t)
    return out


def knife():
    out = blows(BLADE_TICK, TICK_BODY, BLADE, cycles=53, ring_db=-16.0, far_db=-17)
    out += blows(NUDGE, NUDGE_BODY, OPEN_TIN, cycles=12.0, ring_db=-16.5, far_db=-1.5, beam_db=OPEN_TIN_FAR_DB)
    out += blows(LATE_RETURN, KNOCK_BODY, KNIFE, cycles=12.0, ring_db=-20.5, far_db=-30)
    return out + blows(KNOCK, KNOCK_BODY, KNIFE, cycles=25.0, ring_db=-20.0, far_db=-0.7, beam_db=KNIFE_FAR_DB)


def scene():
    near, far = rooms()
    dry = prying() + bench_rubbing() + near_ticks() + dropped_screwdriver()
    dry += lid_rubbing() + lid_lifting() + lid_touching() + knife()
    dry[0] += singing()
    before_cut = np.clip(1 - (np.arange(N) / SR - CUT_S) / CUT_FADE_S, 0, 1)
    landing = before_cut * (heard(lid_landing(), near, far) + wobble())
    return (heard(dry, near, far) + landing + thump() + hiss())[None]


def roll_off(x):
    return signal.sosfilt(signal.butter(12, 16330, fs=SR, output="sos"), x)


def record(dry):
    over_db = np.maximum(20 * np.log10(np.abs(dry[0]) / CEILING + 1e-9), 0)
    fall = 260 * np.arange(N) / SR
    held_db = np.maximum.accumulate(over_db + fall) - fall
    held_db = uniform_filter1d(-minimum_filter1d(-held_db, size=41), size=41)
    top_cut = signal.cheby2(10, 50, 16400, fs=SR, output="sos")
    return roll_off(signal.sosfilt(top_cut, dry * boost_factor(-held_db)))


dry = scene()
out = record(dry)
transcribe(out)
```